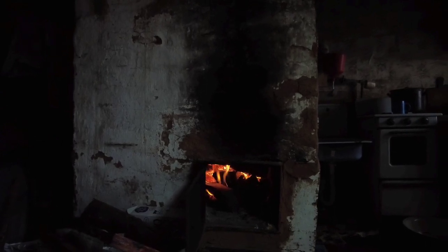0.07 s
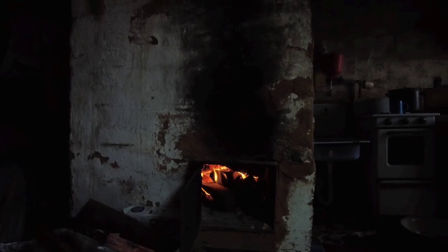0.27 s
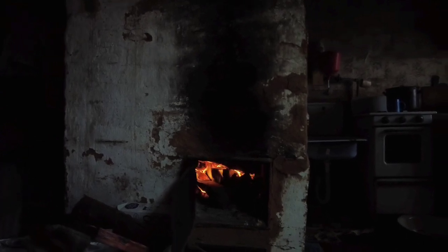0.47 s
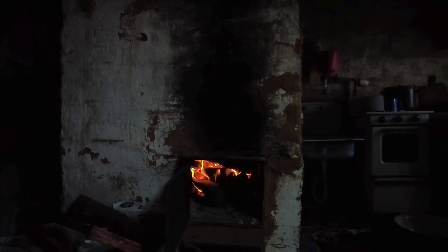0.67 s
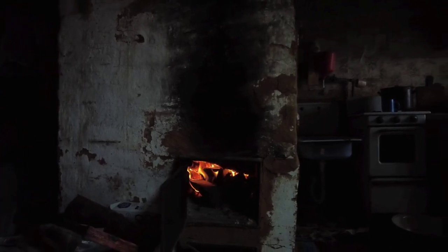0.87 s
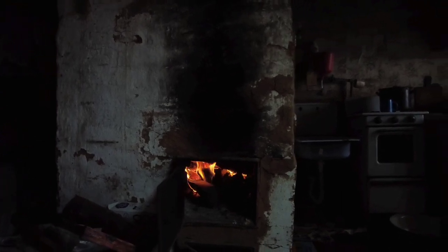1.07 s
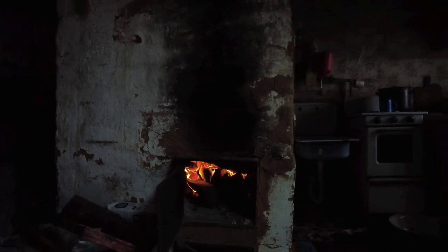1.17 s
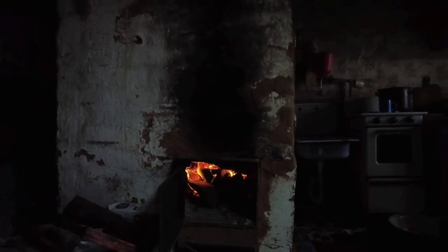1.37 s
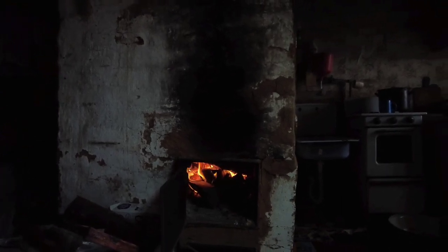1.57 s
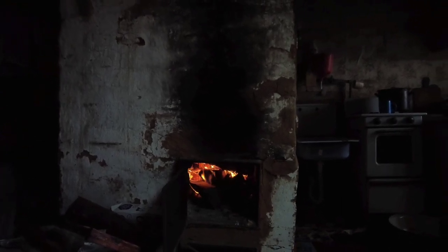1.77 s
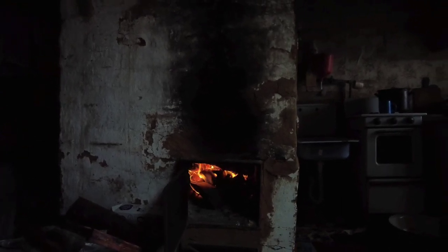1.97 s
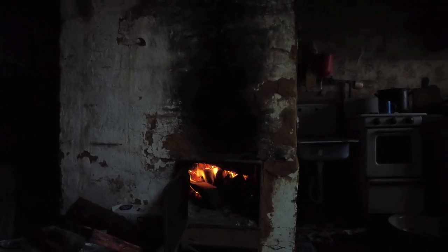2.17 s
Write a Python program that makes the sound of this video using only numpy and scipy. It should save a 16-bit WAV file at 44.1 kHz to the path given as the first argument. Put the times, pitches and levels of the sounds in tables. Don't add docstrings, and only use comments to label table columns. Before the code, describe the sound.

A log fire burns in a brick stove: deep soft flame thumps over a low flue hum, a fading gas hiss, tiny ember ticks, then one sharp sap pop near the end, heard from some steps away in a quiet kitchen.

```python
import sys
import numpy as np
from scipy import signal
from scipy.io import wavfile
from scipy.ndimage import uniform_filter1d

SR = 44100
rng = np.random.default_rng(int(sys.argv[2]) if len(sys.argv) > 2 else 0)


def wrap_up_sound(samples):
    columns = np.atleast_2d(samples).T
    tamed = np.clip(columns, -1, 1)
    steps = np.round(tamed * 32767).astype(np.int16)
    wavfile.write(sys.argv[1], SR, steps)


def linear_from_db(decibels):
    return 10 ** (np.asarray(decibels, float) / 20)


N = 97461
HZ = np.fft.rfftfreq(512, 1 / SR)
SIDES = np.array([[.5], [-.5]])


def evened(x):
    return x / np.sqrt(np.mean(x ** 2) + 1e-20)


def read(points, hz):
    f, value = np.transpose(points)
    return np.interp(np.log(hz + 1), np.log(f + 1), value)


def curve(points):
    s, value = np.transpose(points)
    return np.interp(np.arange(N) / SR, s, value)


def add(mix, s, sound):
    part = mix[..., max(round(s * SR), 0):][..., :sound.shape[-1]]
    part += sound[..., :part.shape[-1]]


def resonate(x, hz, width):
    pole = np.exp((2j * hz - width) * np.pi / SR)
    once = signal.lfilter([1 - abs(pole)], [1, -pole], x)
    return 2 * signal.lfilter([1 - abs(pole)], [1, -pole], once).real


def ring(hz, db, t60, rise):
    t = np.arange(0, .4, 1 / SR)
    onset = 1 - np.exp(-(t / rise) ** 2)
    return linear_from_db(db - 60 * t / t60) * onset * np.sin(2 * np.pi * hz * t)


def noise(colour_db, same, patch_db, flicker_db):
    frames = N // 128 + 8
    a, b, c, d, patches = rng.standard_normal((frames, 257, 5)).T
    patches = uniform_filter1d(patches, size=6, axis=0)
    patches = evened(uniform_filter1d(patches, size=14, axis=1))
    flicker = evened(uniform_filter1d(rng.standard_normal(frames), size=5))
    same = np.clip(same, -1, 1)[:, None]
    left = a + 1j * b
    right = same * left + np.sqrt(1 - same ** 2) * (c + 1j * d)
    z = np.array([left, right]) * linear_from_db(colour_db[..., None] + patch_db * patches + flicker_db * flicker)
    return evened(signal.istft(z, nperseg=512, noverlap=384)[1][:, :N])


def floor():
    # pitch_hz, level_db
    room_colour = [(200, -3), (450, -6.5), (700, -8.5), (1050, -13), (1350, -12.5), (1780, -11),
                   (2200, -16.5), (4000, -17.5)]
    # pitch_hz, level_db
    mic_colour = [(4000, -3.5), (4600, 0), (5900, -1), (7150, -4), (9690, -3), (11300, -5.5), (14800, -2),
                  (15800, 2)]
    # pitch_hz, correlation (-1 to 1)
    likeness = [(60, 1), (290, 0.77), (560, 0.13), (1000, -0.73), (1410, 0.11), (3100, 0.3), (6820, 0.51),
                (15000, 0.3)]
    # pitch_hz, left_minus_right_db
    balance = [(60, 3), (110, 29), (200, -3), (380, 2), (700, 1), (1290, 1), (2380, 0), (4400, 0.5),
               (8120, 0.5), (15000, 4.5)]
    lean, same = read(balance, HZ) * SIDES, read(likeness, HZ)
    low_colour = read(room_colour, HZ) - 60 * (HZ > 4000) - 30 * (HZ < 200) + lean
    high_colour = read(mic_colour, HZ) - 60 * (HZ <= 4000) + lean
    low = noise(low_colour, same, patch_db=2.2, flicker_db=1.2)
    high = noise(high_colour, same, patch_db=.5, flicker_db=1.43)
    return linear_from_db(-66) * low + linear_from_db(-62.5) * high


def kitchen(x):
    t60_s, gap_s = 0.15, .004
    taps = np.zeros((2, 16000))
    at = np.arange(0, 16000, 20) + rng.integers(0, 20, (2, 800))
    np.put_along_axis(taps, at, rng.choice([-1., 1.], at.shape), 1)
    t = np.arange(16000) / SR
    taps = taps * linear_from_db(-60 * t / t60_s) * np.clip(t / gap_s - .5, 0, 1)
    return linear_from_db(-13) * signal.fftconvolve(x, taps / np.linalg.norm(taps[0]), axes=1)[:, :N]


def flue_and_hum():
    t = np.arange(N) / SR
    waves = [np.sin(2 * np.pi * (f * t + rng.random())) for f in np.geomspace(5, 20, num=8)]
    wander_db = 1.5 * evened(sum(waves))
    flue = linear_from_db(-40.5 + wander_db) * np.sin(2 * np.pi * 24.8 * t + 1.29)
    hum = linear_from_db(-53.5 - wander_db[::-1]) * np.sin(2 * np.pi * 100.35 * t)
    return flue + hum


def low_modes():
    # pitch_hz, width_hz, level_db
    room_modes = [(25.4, 4.7, -53), (50.7, 14, -57.5), (61.1, 15, -51.5), (71.8, 4.7, -56.5),
                  (101, 16.7, -63.5), (131.2, 12.6, -63.5), (150.4, 18.2, -60), (189.9, 7.2, -69.5),
                  (210.5, 20.5, -65.5), (254.2, 24, -71), (319.6, 4.3, -76), (388, 116, -72.5),
                  (11.2, 6.6, -58.5)]
    # time_s, level_db
    flame_points = [(0.0, -36), (0.13, -57), (0.25, -59), (0.33, -51), (0.74, -53.5), (0.89, -51),
                    (0.91, -73.5), (1.18, -57.5), (1.21, -41.5), (1.61, -63.5), (1.77, -52), (1.93, -57.5),
                    (1.96, -42), (2.03, -66), (2.17, -51), (2.21, -68)]
    # pitch_hz, correlation
    bass_likeness = [(25, 1), (100, 0.95), (200, 0.86), (400, 0.88)]
    drive, out = rng.standard_normal((2, N)), np.zeros((2, N))
    flame = curve(flame_points)
    swell = linear_from_db(0.26 * (flame - flame.mean()))
    for hz, width, db in room_modes:
        both, apart = resonate(drive, hz, width)
        share = np.clip(read(bass_likeness, hz), -.9, 1)
        pair = np.sqrt(1 + share) * both + np.sqrt(1 - share) * apart * np.array([[1], [-1]])
        out = out + linear_from_db(db) * evened(pair) * (swell if 40 < hz < 90 else 1)
    return out


def hiss():
    # time_s, level_db
    gusts = [
        [(0, -57), (.015, -62.5), (.28, -61.5), (.33, -58.5), (.39, -57), (.45, -58.5), (.5, -62), (.55, -66),
         (.6, -69.5), (.72, -72.5)],
        [(.82, -72.5), (.85, -64), (.864, -58.5), (.885, -62.5), (.95, -68.5), (.98, -73)],
    ]
    # pitch_hz, level_db
    gas_colour = [(250, -3), (500, 1.5), (720, -8), (1200, -11), (2000, -10), (3900, -16.5), (6000, -20),
                  (9000, -31)]
    # pitch_hz, width_hz, lift_db
    cavity = [(919, 40, 12), (1426, 300, 9), (2560, 280, 7), (3280, 185, 7.5), (4305, 86, 9)]
    # pitch_hz, left_minus_right_db
    gas_balance = [(300, 1), (600, 2.5), (1200, .8), (2000, 0)]
    quiet_db = -73
    t, power = np.arange(N) / SR, np.zeros(N)
    for gust in gusts:
        blowing = (t >= gust[0][0]) * (t < gust[-1][0])
        power += np.maximum(linear_from_db(2 * curve(gust)) - linear_from_db(2 * quiet_db), 0) * blowing
    level = uniform_filter1d(np.sqrt(power), size=200)
    lift = sum(db / (1 + ((HZ - hz) / width) ** 2) for hz, width, db in cavity)
    colour = read(gas_colour, HZ) + lift + read(gas_balance, HZ) * SIDES
    return linear_from_db(4) * level * noise(colour, 0.46 + 0 * HZ, patch_db=1.6, flicker_db=.9)


def crumbling_embers():
    # start_s, length_s, level_db, centre_hz
    crumble_events = [
        (0.764, 0.037, -58, 2780),
        (0.862, 0.048, -60, 3520),
        (1.9305, 0.058, -60, 5100),
        (1.651, 0.031, -63, 8500),
        (1.928, 0.065, -59.5, 1360),
        (2.202, 0.013, -60, 900),
    ]
    out = np.zeros((2, N))
    grit = rng.standard_normal((len(crumble_events), 2, 4000))
    for (s, length, db, hz), g in zip(crumble_events, grit):
        u = np.arange(4000) / SR / length
        shape = 3 * np.sqrt(u) * np.exp(-2.5 * u)
        grains = resonate(g + g[::-1] * 0.14, hz, min(1.3 * hz, 3500))
        add(out, s, linear_from_db(db) * evened(grains) * shape)
    return out


def ember_ticks():
    # start_s, peak_db, pitch_hz, left_minus_right_db
    tick_events = [(.1346, -45, 13200, .5), (.1835, -51, 11500, .5), (.5043, -51.5, 11500, 1.5),
                   (.5836, -54, 14000, 0), (.7527, -60, 14500, 1.5), (.7771, -45, 14000, .5),
                   (1.1104, -52, 10800, 2), (1.2974, -46.5, 14200, .5), (1.6488, -51, 8800, 1),
                   (1.9121, -60, 12000, 1.5), (2.0936, -51, 13500, 1)]
    delay_s, fizz_s, fizz_db = .0012, .003, -15.5
    out, click = np.zeros((2, N)), np.eye(1, 300, 8)[0]
    sharp = np.diff(click, n=1, prepend=[0])
    swell = np.exp(-abs(np.arange(600) - 250) / SR / fizz_s)
    fizz = np.diff(rng.standard_normal((len(tick_events), 2, 601))) * swell
    for (s, db, hz, pan_db), f in zip(tick_events, fizz):
        add(out, s + delay_s - 250 / SR, linear_from_db(db + fizz_db) * f)
        tick = resonate(click, hz, .4 * hz)
        tick = tick / abs(tick).max() + linear_from_db(1) * sharp
        add(out, s + delay_s, linear_from_db(db + pan_db * SIDES) * tick)
    return out


def sap_pop():
    crack_start = [
        1.6498,
        1.6505,
        1.653,
        1.9267,
        1.9268,
        1.9268,
        1.92735,
        1.92855,
        1.929,
        1.92935,
    ]
    # level_db, pitch_hz
    crack_tone = [(-41.5, 9400), (-43, 7500), (-44.5, 8300), (-22.5, 5900), (-35, 4200), (-36, 7400),
                  (-29, 5900), (-28, 5050), (-39, 3700), (-31, 5400)]
    # pitch_hz, level_db, t60_s
    log_rings = [(310, -57, .05), (450, -44.5, .04), (600, -54, .02), (910, -45, .02), (1270, -41.5, .024),
                 (1600, -54, .012), (2300, -54, .01), (13100, -48, .006)]
    # start_s, pitch_hz, level_db, t60_s
    knocks = [
        (1.641, 3150, -62, .02),
        (1.8185, 5800, -60, .015),
        (1.662, 1250, -64, .06),
    ]
    # pitch_hz, level_db, t60_s
    wall_thud = (600, -50, .012)
    pop_s, t60_s = 1.9258, .0032
    out, t = np.zeros(N), np.arange(200) / SR
    snaps = rng.standard_normal((len(crack_tone), 200))
    for s, (db, hz), snap in zip(crack_start, crack_tone, snaps):
        add(out, s, ring(hz, db, t60_s, rise=.0002))
        add(out, s, linear_from_db(db - 22 - 60 * t / t60_s) * uniform_filter1d(snap, size=5))
    for hz, db, t60 in log_rings:
        add(out, pop_s, ring(hz, db, t60, rise=0.00025))
    for s, hz, db, t60 in knocks:
        add(out, s, ring(hz, db, t60, rise=0.00046))
    pair = np.array([out, .25 * out + .75 * np.roll(out, shift=1)])
    add(pair[0], pop_s, ring(*wall_thud, rise=0.00023))
    return pair


def flame_puffs():
    # start_s, pitch_hz
    puff_start = [(0, 430), (0, 250), (0, 165), (.125, 400), (.2, 255), (.3, 217), (.33, 60), (.8, 72),
                  (.822, 156), (.85, 212), (.86, 330), (.86, 380), (.86, 465), (1.3, 155), (1.31, 205),
                  (1.52, 212), (1.765, 157), (1.765, 215), (1.9, 212), (1.945, 55), (2.15, 52), (.06, 70),
                  (.37, 72), (.56, 65), (1.18, 68), (1.3, 72), (1.76, 70), (.56, 150), (1.46, 150),
                  (.9, 155), (0, 215), (1.74, 410), (.32, 440), (.55, 48), (2.05, 150), (1.63, 560),
                  (1.64, 700), (1.62, 205), (1.52, 400), (2.07, 450), (.76, 600), (.57, 600), (.24, 100),
                  (2.06, 95)]
    # level_db, t60_s
    puff_decay = [(-49, 0.096), (-53, 0.17), (-51, 0.16), (-47, 0.083), (-59.5, 0.22), (-50, 0.22),
                  (-40, 0.25), (-46, 0.73), (-45, 0.24), (-48, 0.2), (-54, 0.12), (-51, 0.12), (-53, 0.12),
                  (-42.5, 0.22), (-61, 0.12), (-51.5, 0.16), (-43.5, 0.194), (-54, 0.15), (-54.5, 0.23),
                  (-36.5, 0.156), (-42, 0.27), (-39.5, 0.19), (-45, 0.36), (-42.5, 0.22), (-43, .3),
                  (-50, 0.29), (-46.5, 0.4), (-54, 0.12), (-48, 0.12), (-47.5, 0.16), (-52.5, 0.19),
                  (-59.5, .12), (-72, 0.054), (-48, 0.18), (-55, 0.15), (-61.5, 0.095), (-67, 0.078),
                  (-72, 0.1), (-70, 0.097), (-66, 0.16), (-66, 0.11), (-60, 0.11), (-63, 0.059),
                  (-61, 0.19)]
    out = np.zeros((2, N))
    for (s, hz), (db, t60) in zip(puff_start, puff_decay):
        add(out, s, ring(hz, db + 8, t60, rise=.018))
    return out


def scene():
    sharp = crumbling_embers() + ember_ticks() + sap_pop()
    fire = flue_and_hum() + low_modes() + hiss() + flame_puffs()
    return floor() + fire + sharp + kitchen(sharp)


def top_cut(x):
    return signal.sosfilt(signal.butter(12, 15750, fs=SR, output="sos"), x)


def record(dry):
    lowpass = signal.firwin(1023, 15670, window=("kaiser", 9), fs=SR)
    mix = signal.oaconvolve(dry, lowpass[None], "same")
    return top_cut(mix)


dry = scene()
out = record(dry)
wrap_up_sound(out)
```